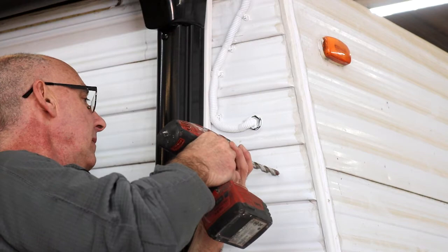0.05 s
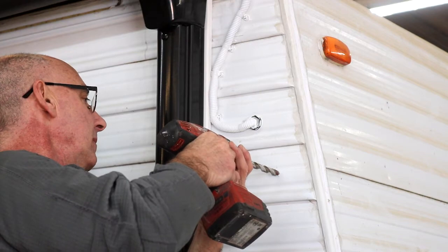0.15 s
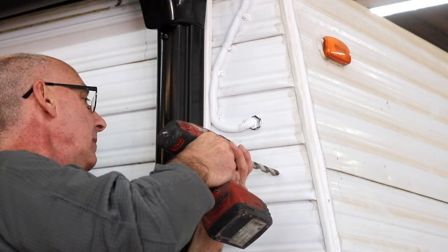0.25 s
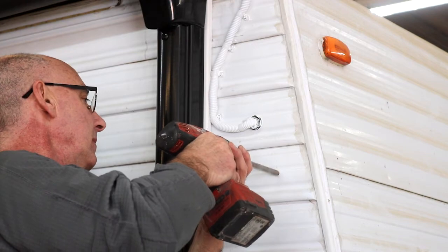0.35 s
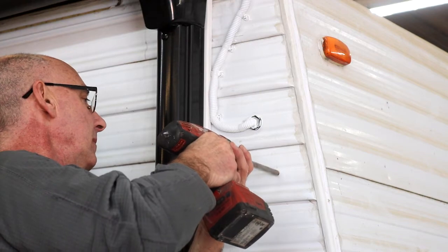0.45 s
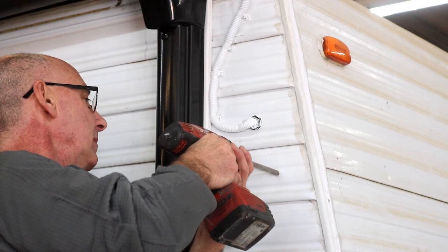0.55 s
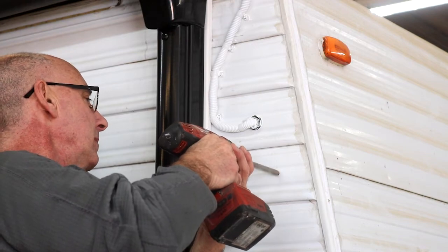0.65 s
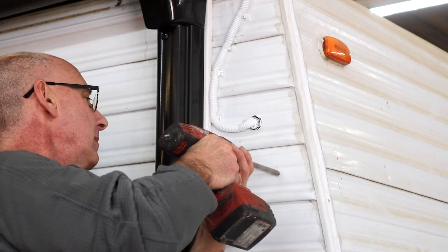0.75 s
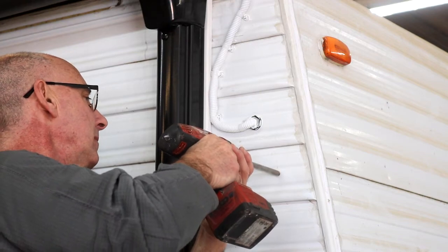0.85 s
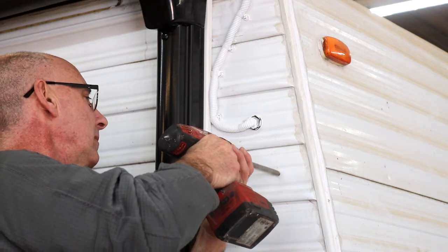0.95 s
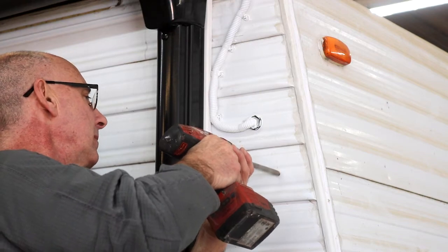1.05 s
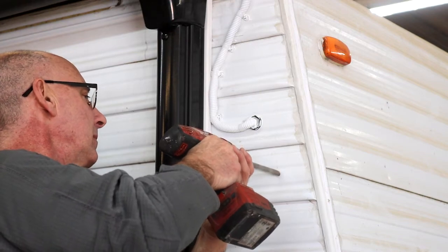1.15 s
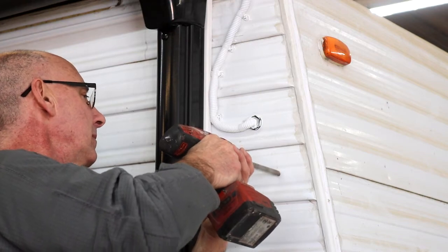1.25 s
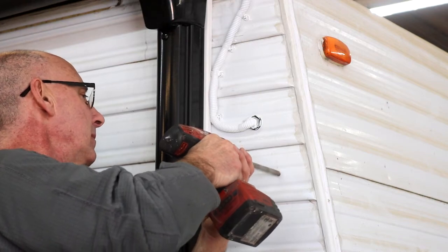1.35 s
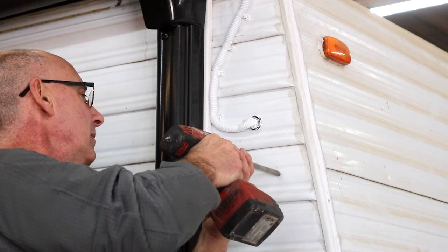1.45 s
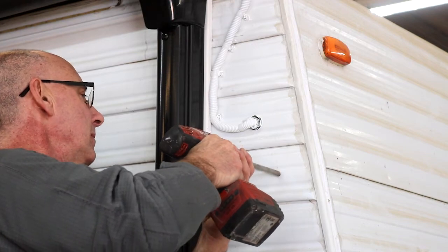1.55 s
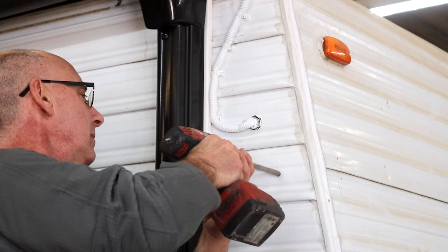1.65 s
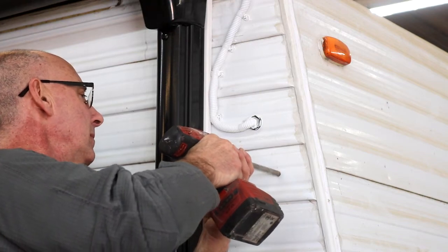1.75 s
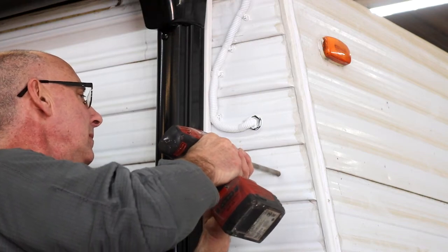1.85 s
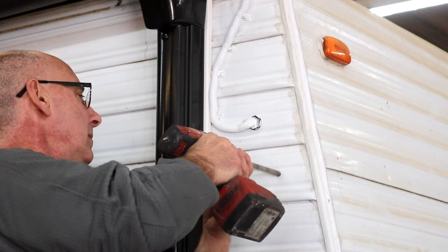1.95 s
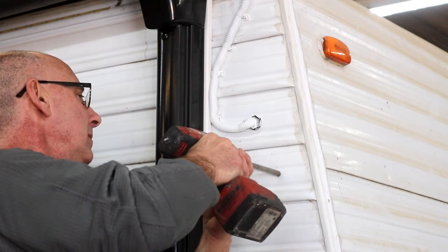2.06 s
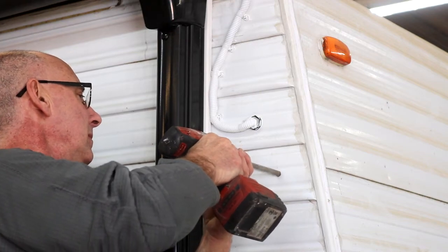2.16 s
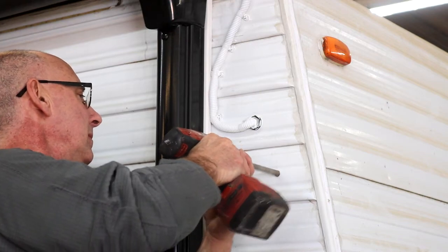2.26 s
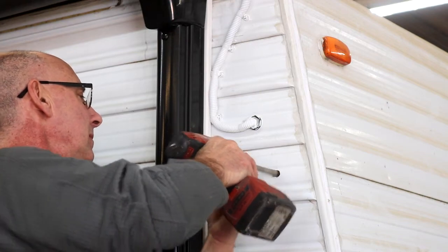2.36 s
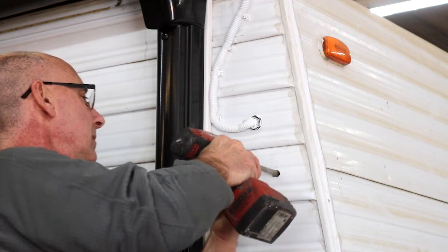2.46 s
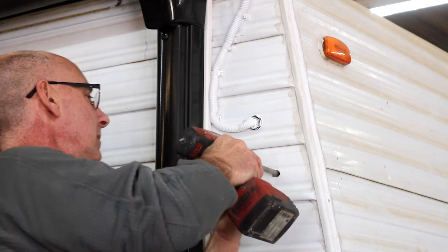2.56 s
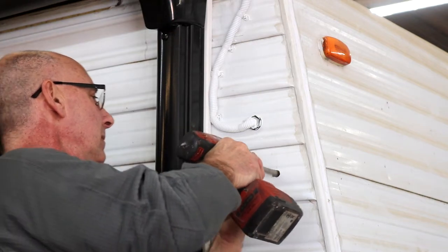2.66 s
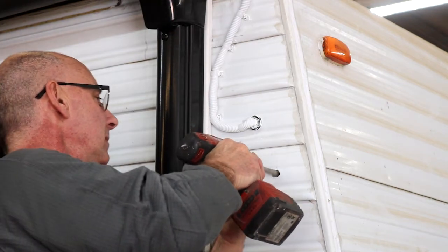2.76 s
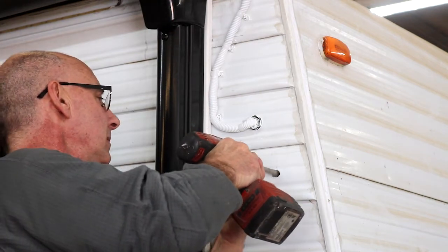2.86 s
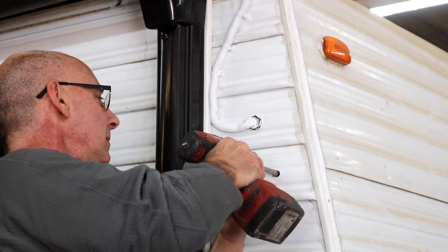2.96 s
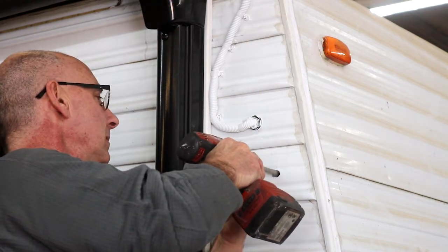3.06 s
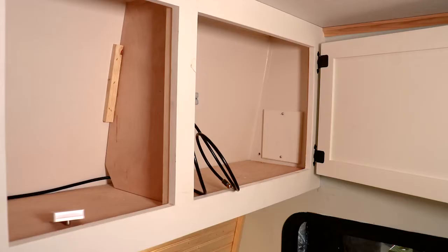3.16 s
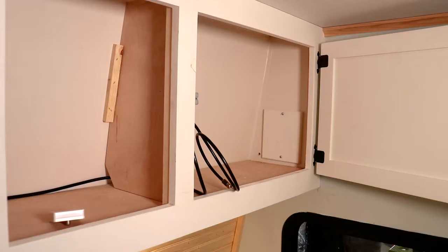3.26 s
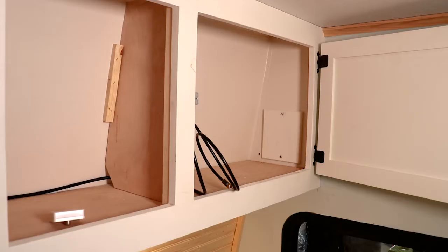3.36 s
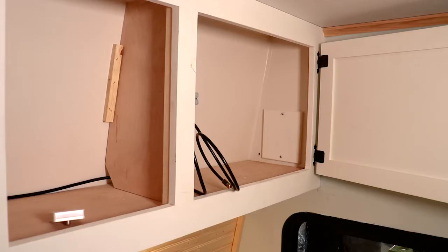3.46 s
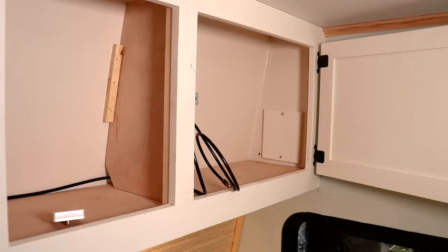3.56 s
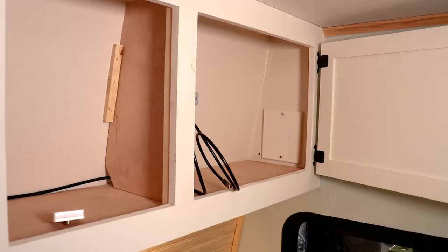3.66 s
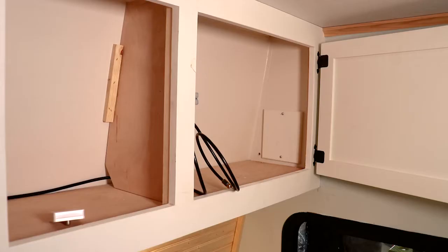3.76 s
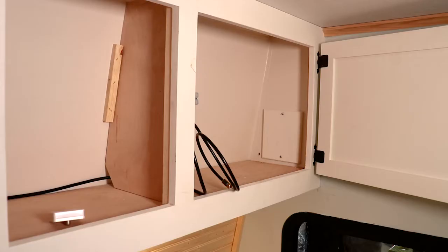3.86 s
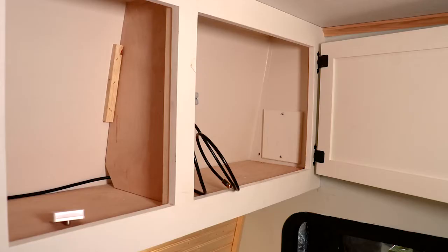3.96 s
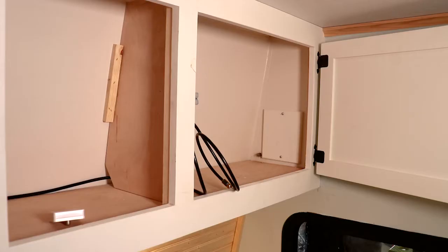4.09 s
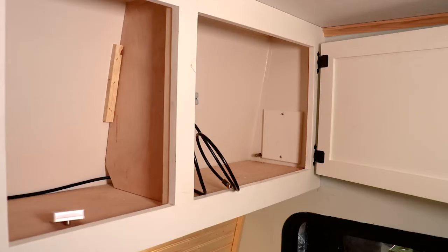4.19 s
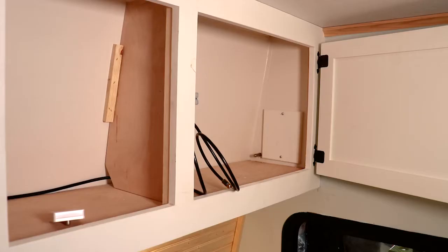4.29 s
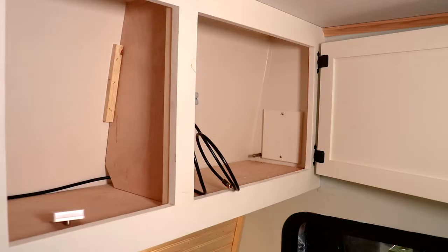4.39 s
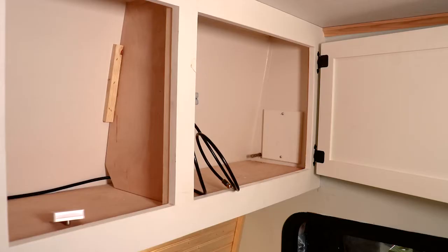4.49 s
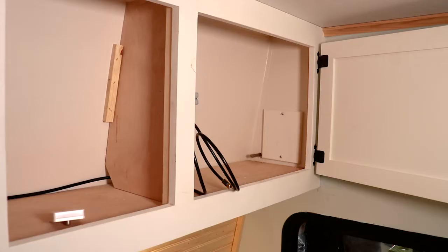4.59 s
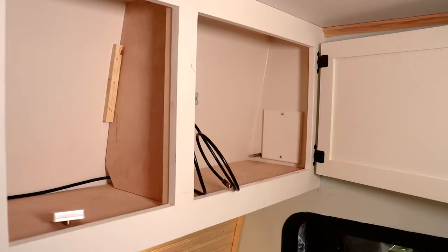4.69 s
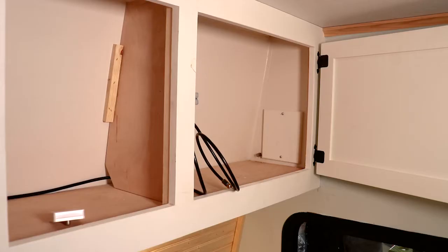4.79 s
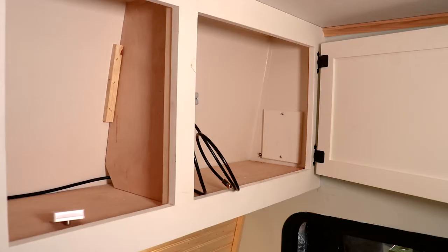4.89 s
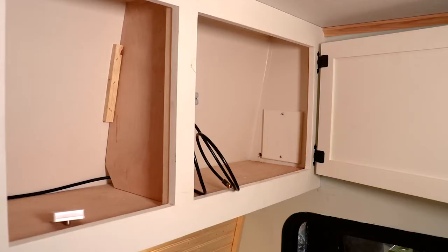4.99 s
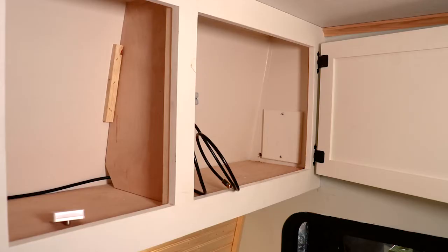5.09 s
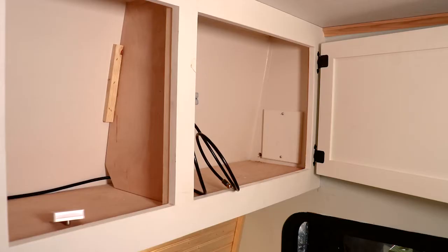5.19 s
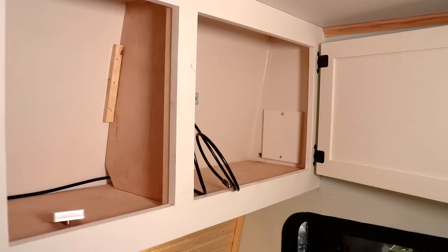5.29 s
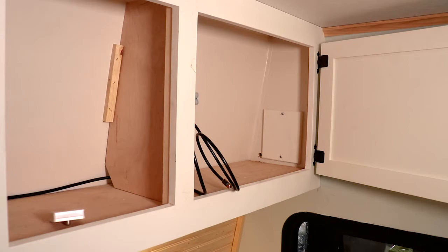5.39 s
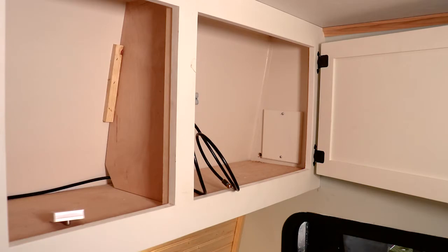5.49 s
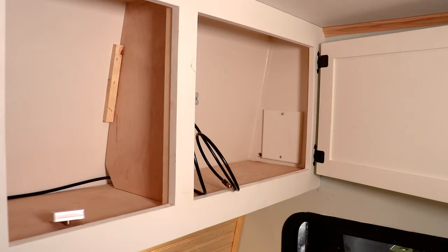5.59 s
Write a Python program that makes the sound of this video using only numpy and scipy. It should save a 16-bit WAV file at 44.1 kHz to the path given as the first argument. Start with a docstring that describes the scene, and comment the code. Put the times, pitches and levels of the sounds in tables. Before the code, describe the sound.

A cordless drill whines and whirrs as it bores through a rattling sheet-metal wall in an echoing shed, then brakes to a stop.

```python
"""A cordless drill bores through a ribbed sheet-metal wall in a large shed, then brakes to a stop.
Commutator and gears whine over the whirr of the motor; the housing screeches as it takes up load, then
the bit's two flutes bite, drumming and knocking the panel. At the start the echo of an earlier burst is
dying away over faint air noise and mains hum. One microphone, near enough to hear more drill than echo;
part-way the level is abruptly turned down, drill and echo together."""
import sys
import numpy as np
from scipy import signal
from scipy.fft import rfft, irfft
from scipy.io import wavfile
from scipy.ndimage import uniform_filter1d

SR = 44100
rng = np.random.default_rng(int(sys.argv[2]) if len(sys.argv) > 2 else 0)


def digitize_waveform(pressure):
    """Quantize a signal to 16-bit integers and store it at the path in sys.argv[1].

    Rows of a 2-D input are taken as channels; values are limited to [-1, 1].
    """
    field = np.atleast_2d(pressure).T
    bounded = np.clip(field, -1, 1)
    quanta = np.round(bounded * 32767).astype(np.int16)
    wavfile.write(sys.argv[1], SR, quanta)


N = 248415
TIME = np.arange(N) / SR
START_S, BRAKE_S = .309, 5.105  # the motor starts; the brake grips

# Spectra of the drumming wall, the rattling ribs and the whirring motor.
# Each row: frequency in Hz, relative level in dB.
DRUM_SPECTRUM = [(18, -89), (30, -44), (80, -26), (188, -1.5), (284, -7), (362, 5), (411, 0), (677, -1.5),
                 (900, 0), (1170, -29.5), (1980, -120)]
RATTLE_SPECTRUM = [(410, -20.5), (700, -10), (764, -14), (964, 2), (1210, 4.5), (1820, 1), (2400, 2),
                   (3120, -16), (5280, -120)]
WHIRR_SPECTRUM = [(1180, -22), (2000, -3), (2870, 3), (4420, 0), (6460, -7.5), (7100, -8), (10000, -10),
                  (11600, -18), (14500, -18), (15700, -21.5)]
# Resonances of the wall and of the drill's housing. Each row: centre in Hz, width in Hz, lift in dB.
WALL_MODES = [(190, 26, -0.5), (339, 19, 3.5), (456, 4.7, 11), (693, 12, 7.5), (1040, 140, -1),
              (1397, 100, 2.5), (2088, 110, 3.5)]
HOUSING_MODES = [(2400, 90, 4), (5150, 430, 2), (6450, 630, 3)]


def gain_of(db):
    """Decibels to an amplitude factor."""
    return 10 ** (np.asarray(db) / 20)


def unit_rms(x):
    """Scales to rms 1."""
    return x / np.sqrt(np.mean(x ** 2) + 1e-20)


def at_hz(points, hz):
    """Interpolates a table on a log-frequency axis."""
    f, value = np.transpose(points)
    return np.interp(np.log(hz + 1), np.log(f + 1), value)


def curves(table):
    """Every column after the time column, sample by sample."""
    seconds, *columns = np.transpose(table)
    return [np.interp(TIME, seconds, column) for column in columns]


def through(x, taps):
    """Convolution, cut to the length of x."""
    return signal.oaconvolve(x, taps)[:len(x)]


def colour(x, spectrum, modes=()):
    """Passes x through a causal, unit-energy response with this spectrum and these resonances."""
    hz = np.fft.rfftfreq(8192, 1 / SR)
    db = at_hz(spectrum, hz) + sum(lift / (1 + (2 * (hz - f) / width) ** 2) for f, width, lift in modes)
    db -= 80 * np.clip(np.log2(spectrum[0][0] / (hz + 1)), 0, 1)
    db -= 80 * np.clip(np.log2((hz + 1) / spectrum[-1][0]), 0, 1)
    cepstrum = irfft(db * np.log(10) / 20)
    cepstrum[1:4096] *= 2  # fold to minimum phase
    cepstrum[4097:] = 0
    taps = irfft(np.exp(rfft(cepstrum)))[:4096]
    return through(x, taps / np.linalg.norm(taps))


def wobble(seconds):
    """Random drift of rms 1, smoothed over this time."""
    width = int(seconds * SR)
    return unit_rms(uniform_filter1d(uniform_filter1d(rng.standard_normal(N), width), width))


def room_tone(hum_hz=123):
    """Faint air noise and a wavering mains hum fill the shed."""
    # The air. Each row: frequency in Hz, relative level in dB.
    air_spectrum = [(18, -43), (30, -24), (88, -8), (182, 2), (359, 9), (747, -32), (1110, -2), (5310, -9),
                    (15500, -23)]
    air = gain_of(-53) * colour(rng.standard_normal(N), air_spectrum)
    return air + gain_of(-59.5 + 2.8 * wobble(.046)) * np.sin(2 * np.pi * hum_hz * TIME)


def shed_echo(x):
    """Diffuse echo, reaching the microphone 9 ms late; each band dies at its own speed."""
    # The shed's decay. Each row: frequency in Hz, seconds to fall 60 dB.
    decay_times = [(100, 0.64), (400, 1.), (1500, 0.95), (4000, 0.58), (10000, 0.33)]
    hz, t, bands = signal.stft(rng.standard_normal(SR), SR, nperseg=256)
    decay = gain_of(-60 * t / at_hz(decay_times, hz)[:, None])
    tail = signal.istft(bands * decay, SR, nperseg=256)[1]
    return through(x, np.r_[np.zeros(400), tail / np.linalg.norm(tail)])


def earlier_burst():
    """Only the echo of a burst of drilling that has just ended."""
    # The burst. Each row: frequency in Hz, relative level in dB.
    burst_spectrum = [(35, -30), (60, -34), (539, -17), (605, -20.5), (855, -17), (1390, -15.5),
                      (1710, -18.5), (2590, -8.5), (15000, -29)]
    burst = colour(rng.standard_normal(SR), burst_spectrum, HOUSING_MODES)
    return gain_of(-32.5) * shed_echo(np.r_[burst, np.zeros(N)])[SR:]


def trigger():
    """The switch contact chatters for a moment and rings in the housing."""
    # Switch clicks. Each row: start in seconds, level in dB, ring in Hz.
    clicks = [(0.241, -46, 5230), (0.311, -23, 5190)]
    out, ms = np.zeros(N), np.arange(1500) / SR * 1000
    envelope = np.clip(ms / 3, 0, 1) * np.clip((19 - ms) / 6, 0, 1)
    for start, db, hz in clicks:
        ring = np.sin(2 * np.pi * hz * ms / 1000) * np.cos(2 * np.pi * ms / 8.4)
        out[round(start * SR):][:1500] += gain_of(db) * envelope * (ring + .027 * rng.standard_normal(1500))
    return out


def screech():
    """A narrow, rasping screech near 5 kHz rings in the drill's housing as it takes up load."""
    # Its rise and fall. Each row: time in seconds, level in dB.
    screech_levels = [(.42, -60), (.5, -31.5), (.85, -27.5), (.95, -60)]
    # The housing's resonance. Each row: frequency in Hz, relative level in dB.
    screech_spectrum = [(4700, -3), (5150, -2), (5500, -21)]
    screeching = (TIME > screech_levels[0][0]) * (TIME < screech_levels[-1][0])
    rasp = rng.standard_normal(N) * gain_of(curves(screech_levels)[0] + 2 * wobble(.0054))
    return colour(rasp * screeching, screech_spectrum)


def bars_passed(spin_up_s=.083):
    """Commutator bars passed as the motor spins up, then sags wherever the bit binds."""
    # The speed the load allows. Each row: time in seconds, bars per second.
    loaded_speed = [(.53,4630), (.6,4290), (.66,4040), (.78,3710), (.835,3640), (.88,4030), (.98,4403),
                    (1.1,4534), (1.18,4586), (1.56,4442), (1.93,4373), (2.28,4250), (2.36,3875),
                    (2.42,3927), (2.57,4420), (2.63,4508), (2.99,4624), (3.29,4545), (3.61,4614),
                    (4.08,4442), (4.16,4370), (4.21,3966), (4.35,4328), (4.46,4460), (4.6,4559),
                    (4.87,4619), (5.14,4660)]
    spin_up = 1 - np.exp(-np.maximum(TIME - START_S, 0) / spin_up_s)
    return np.cumsum(curves(loaded_speed)[0] * spin_up) / SR


def half_turns(bars_per_bite=115.5, sharp_bite_s=1.0105):
    """Half turns of the chuck, counted from one bite of the sharper flute."""
    halves = bars_passed() / bars_per_bite
    return halves - halves[round(sharp_bite_s * SR)]


def bites(spread_db, jitter):
    """One click each half turn of the chuck, uneven in size; one flute is duller than the other."""
    halves = np.floor(half_turns() + jitter * wobble(.02))
    clicks = np.diff(np.maximum.accumulate(halves), prepend=halves[0]) > 0
    return clicks * gain_of(spread_db * np.clip(rng.standard_normal(N), -2, 2) - 1.8 * (halves % 2))


def rib_ring(strikes, hz=1201, ring_ms=3.8):
    """The rib beside the hole rings when a flute strikes squarely, swelling over a few cycles."""
    ms = np.arange(2000) / SR * 1000
    ring = ms * np.exp(-2 * ms / ring_ms) * np.sin(2 * np.pi * hz * ms / 1000)
    return through(strikes, ring / np.linalg.norm(ring))


def grip():
    """Firm, even bites pump the wall in a pitched growl and ping the rib."""
    # How firmly the flutes grip the sheet. Each row: time in seconds, level in dB.
    firmness = [(.4,-46), (.8,-41), (1.05,-40), (1.4,-43), (1.9,-38), (2.24,-36.5), (2.32,-43.5),
                (3.19,-46), (4.1,-39), (4.3,-48), (4.6,-61), (5.1,-60), (5.2,-70)]
    # The growl. Each entry: relative level in dB of harmonic 1, 2, .. of the bite rate.
    harmonics_db = [-33, -13, -16, -5, -6, -16, -4, -4, -1, -4.5, -12, -10]
    level = gain_of(curves(firmness)[0]) * np.clip((TIME - firmness[0][0]) / .1, 0, 1)
    halves, growl = half_turns(), 0
    for k, db in enumerate(harmonics_db, 1):
        growl += gain_of(db + 1.8 * wobble(.15)) * np.sin(2 * np.pi * (k * halves + rng.random()))
    pings = rib_ring(unit_rms(bites(spread_db=5, jitter=.03)) * level)
    return level * growl + gain_of(4.5) * pings


def catches():
    """Lists where the bit catches: start in seconds, level in dB, treble, thud and rib shares in dB."""
    # Single catches. Each row: start in seconds, level in dB, treble and thud shares in dB.
    singles = [(1.422,-9,-12,-4), (1.474,-13,-16,-14), (1.992,-4,-20,-13), (2.047,-12,-24,-19),
               (2.298,-9,-13,-14), (2.314,0,-15,-21), (2.404,-4.5,-19,-26), (2.473,-8,-19,-12),
               (2.605,-5,-18.5,-15), (2.661,-3.5,-17,-3.5), (2.667,-3.5,-21,-24), (2.689,-8,-21,-11),
               (2.911,-3.5,-19,-15.5), (3.065,-2,-25,-15), (3.118,-9.5,-58,-9), (3.265,-6.5,-33,1.5),
               (4.129,-5,-18,-13), (4.238,-6,-19,-3), (4.514,-11.5,-20,-18), (4.709,-4.5,-27,-5.5),
               (5.1,-7,-11,2.5), (5.12,-7.5,-24,-13), (5.144,-14,-9,-3), (5.17,-5.5,-20,-8),
               (5.186,-4,-15,-18)]
    # Runs in step with the chuck. Each row: start and end in seconds, half turns between knocks,
    # level in dB, treble and rib shares in dB.
    runs = [(1., 1.33, 2, -8, -17, -9.5), (1.51, 1.85, 1, -13.5, -13, -5.5)]
    single_rib_db, run_thud_db = -17.5, -22
    rows, halves = [(*row, single_rib_db) for row in singles], half_turns()
    uneven_db = 1.2 * rng.standard_normal(round(halves[-1]))
    for first, last, step, db, treble_db, rib_db in runs:
        for k in range(0, len(uneven_db), round(step)):
            start = np.interp(k, halves, TIME)
            if first < start < last:
                rows.append((start, db + uneven_db[k], treble_db, run_thud_db, rib_db))
    return rows


def knocks(rise_ms=1.47, decay_ms=3.8):
    """The bit catches an edge: a jolt swells fast and grinds away, ringing wall, rib and housing."""
    thud, rattle, treble, pings = np.zeros((4, N + 2000))
    ms = np.arange(2000) / SR * 1000
    envelope = (1 - np.exp(-ms / rise_ms)) * np.exp(-ms / decay_ms)
    for start, db, treble_db, thud_db, rib_db in catches():
        at = round(start * SR)
        jolt = gain_of(db) * rng.standard_normal(2000) * envelope
        thud[at:][:2000] += gain_of(thud_db) * jolt
        rattle[at:][:2000] += jolt
        treble[at:][:2000] += gain_of(treble_db) * jolt
        pings[at] += gain_of(db + rib_db)
    clank = colour(thud, DRUM_SPECTRUM, WALL_MODES)
    clank += gain_of(-3.5) * colour(rattle, RATTLE_SPECTRUM, WALL_MODES)
    clank += gain_of(8) * colour(treble, WHIRR_SPECTRUM, HOUSING_MODES)
    return (clank + gain_of(21) * rib_ring(pings))[:N]


def spells(table, edge_db=-10):
    """Level in dB of a tone that swells and fades in spells."""
    return np.max([db + edge_db * ((TIME - middle) / half) ** 4 for middle, half, db in table], axis=0)


def whine():
    """Commutator and gear tones follow the motor speed, each wavering a little; the brake kills them."""
    # The tones. Each row: multiple of the bar rate, name of the level it follows, offset in dB.
    tones = [(1, "whine", 0), (14 / 15, "whine", -12), (2, "octave", 0), (28 / 15, "octave", -9),
             (42 / 15, "octave", -21), (1.9033, "octave", -7), (.6934, "mesh", 0),
             (1.3868, "mesh octave", 0), (1.409, "chatter", -2), (1.36, "chatter", -6),
             (1.465, "chatter", -6), (1.131, "chatter", -6), (1.686, "chatter", -10),
             (1.9137, "chatter", -8)]
    # The main pair. Each row: time in seconds, commutator whine in dB, gear mesh in dB.
    main_levels = [(.37,-46,-47), (.41,-44,-38), (.46,-27,-21.5), (.53,-27.5,-38), (.6,-27,-40),
                   (.69,-32,-26), (.79,-27,-34), (.87,-34,-23.5), (.97,-26.5,-27.5), (1.06,-31,-36),
                   (1.43,-30.5,-31), (1.55,-61,-29), (1.93,-29,-31.5), (2.08,-50,-33.5), (2.24,-34,-35),
                   (2.33,-37,-27.5), (2.45,-42,-36), (2.65,-32,-46), (2.86,-45,-39.5), (3.19,-32.5,-39.5),
                   (3.9,-35,-42), (4.05,-25,-39), (4.13,-34,-34), (4.18,-36,-20), (4.27,-32,-28.5),
                   (4.4,-31,-32), (4.55,-28.5,-38), (4.7,-31.5,-38), (5.08,-31.5,-36)]
    # The whine's octave stands out as the load lifts. Each row: time in seconds, level in dB.
    octave_levels = [(.4,-39), (.8,-44), (1., -42), (1.2,-38.5), (1.93,-51), (2.45,-50), (2.65,-46),
                     (3.5,-40), (4.,-39), (4.15,-50), (4.45,-37), (5.08,-37)]
    # Spells of the weaker gear tones. Each row: middle and half length in seconds, level in dB.
    mesh_octave_spells = [(.41, .05, -23), (.78, .12, -33)]
    chatter_spells = [(1.25, 0.22, -48), (2.86, .12, -44), (3.7, 0.4, -41), (4.05, 0.13, -36),
                      (4.34, 0.085, -39), (4.78, 0.13, -30.5), (5.02, 0.3, -30.5)]
    whine_db, mesh_db = curves(main_levels)
    level_db = {"whine": whine_db, "octave": curves(octave_levels)[0], "mesh": mesh_db,
                "mesh octave": spells(mesh_octave_spells), "chatter": spells(chatter_spells)}
    running = np.clip((TIME - .325) / .019, 0, 1) * np.exp(-np.maximum(TIME - BRAKE_S, 0) / .022)
    bars, out = bars_passed(), 0
    for multiple, name, offset_db in tones:
        roughness = .06 * multiple + .5 * (name in ("mesh octave", "chatter"))
        phase = 2 * np.pi * (multiple * bars + rng.random()) + roughness * wobble(.0022)
        waver_db = 2.2 * wobble(.008) + .7 * wobble(.025)
        out += gain_of(level_db[name] + offset_db + waver_db) * np.sin(phase)
    return np.sqrt(2) * running * out


def scrape(tick, swell, swell_ms):
    """Cutting force: steady scraping, a swell of it after each bite, and the bite's own tick."""
    clicks = bites(spread_db=4, jitter=.04)
    after_bite = unit_rms(through(clicks, np.exp(-np.arange(1500) / (swell_ms * SR / 1000))))
    return unit_rms((1 + swell * after_bite) * rng.standard_normal(N) + tick * unit_rms(clicks))


def boring():
    """The cutting force drums the wall and rattles the ribs; brushes, fan and gears whirr in the housing."""
    # How hard the drill works. Each row: time in seconds, then drumming, rattle and whirr in dB.
    effort = [(.312,-36,-34,-33.5), (.35,-39,-28,-23.5), (.4,-30,-26,-19), (.53,-25,-21.5,-18.5),
              (.63,-29,-25,-19), (.78,-31,-30,-20), (.96,-24,-21.5,-18), (1.05,-27,-21.5,-20.5),
              (1.38,-28.5,-26,-21.5), (1.57,-24.5,-18,-22), (1.72,-29.5,-22.5,-24.5),
              (2.18,-24.5,-20.5,-22.5), (2.4,-22.5,-22.5,-25.5), (2.78,-26,-28.5,-26.5),
              (3.12,-23,-27.5,-23), (3.53,-25.5,-25,-23.5), (3.62,-23.5,-22,-21.5), (4.21,-24,-26,-22),
              (4.34,-28,-35,-23.5), (4.74,-22.5,-32,-18), (5.06,-22.5,-27.5,-21), (5.2,-17.5,-21,-20.5),
              (5.34,-62,-30,-30.5)]
    drum_db, rattle_db, whirr_db = curves(effort)
    level = gain_of(-4) * (TIME > START_S) * np.exp(-np.maximum(TIME - effort[-1][0], 0) / .058)
    drum = scrape(tick=.28, swell=1, swell_ms=20.6) * gain_of(drum_db)
    rattle = scrape(tick=.2, swell=.8, swell_ms=5) * gain_of(rattle_db)
    whirr = scrape(tick=.26, swell=.19, swell_ms=22) * gain_of(whirr_db + .38 * wobble(.005))
    return (colour(level * drum, DRUM_SPECTRUM, WALL_MODES)
            + colour(level * rattle, RATTLE_SPECTRUM, WALL_MODES)
            + colour(level * whirr, WHIRR_SPECTRUM, HOUSING_MODES))


def scene(level_drop_s=3.195):
    """Part-way, drill and echo are abruptly turned down together; the room tone drops less."""
    drill = whine() + boring() + grip() + screech() + knocks() + trigger()
    turned_down = TIME > level_drop_s
    background = gain_of(-4 * turned_down) * room_tone()
    drill_in_shed = drill + gain_of(-5.5) * shed_echo(drill)
    mono = gain_of(-10 * turned_down) * drill_in_shed + background + earlier_burst()
    return np.array([mono, mono])


def record(dry):
    """A steep low-pass takes off the highest treble."""
    cutoff_hz = 15700
    low_pass = signal.firwin(1023, cutoff_hz, window=("kaiser", 12), fs=SR)
    return signal.oaconvolve(dry, low_pass[None], "same")


dry = scene()
out = record(dry)
digitize_waveform(out)
```